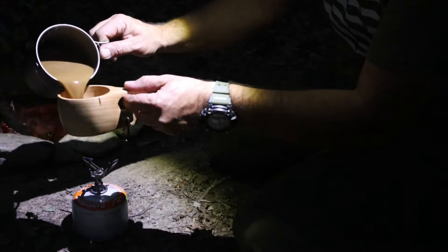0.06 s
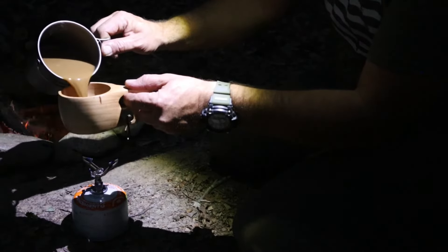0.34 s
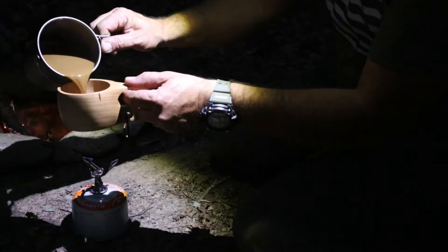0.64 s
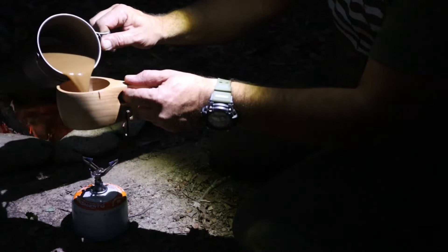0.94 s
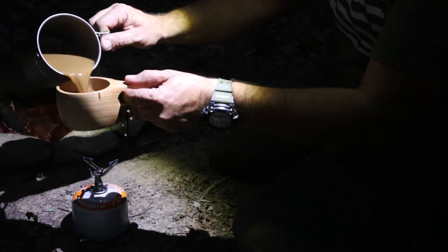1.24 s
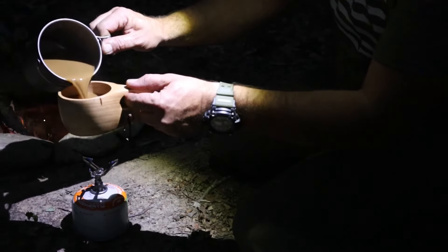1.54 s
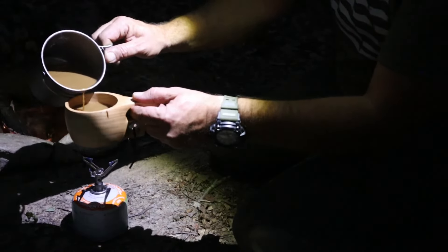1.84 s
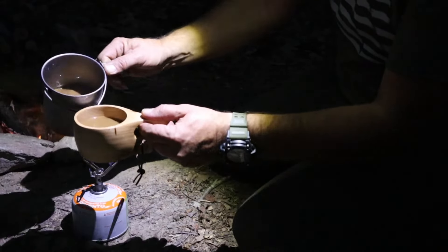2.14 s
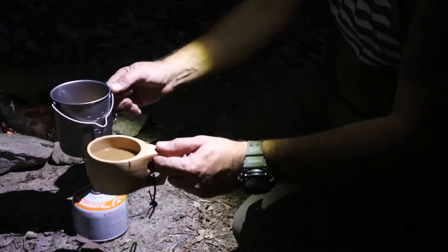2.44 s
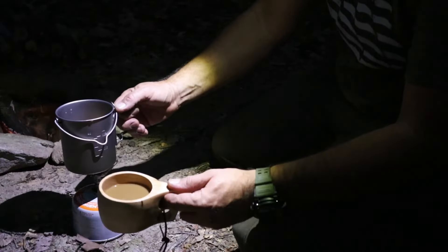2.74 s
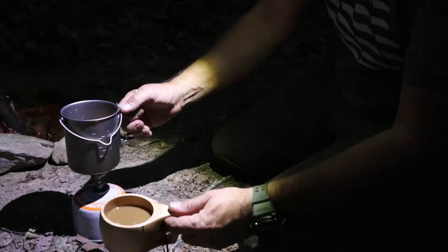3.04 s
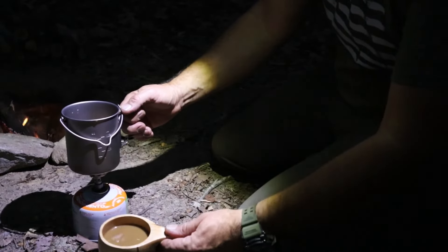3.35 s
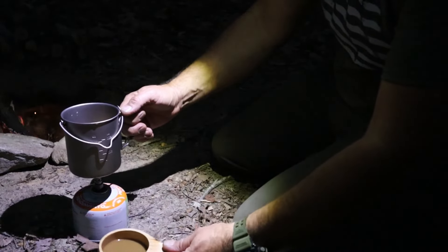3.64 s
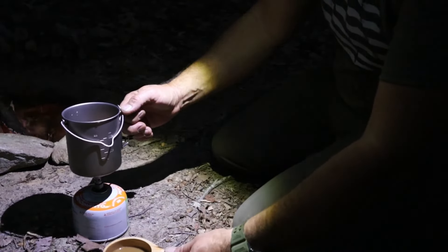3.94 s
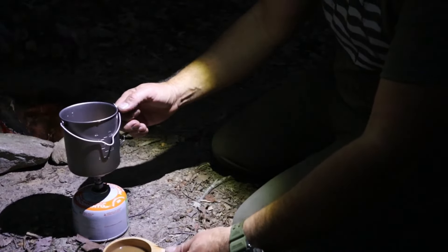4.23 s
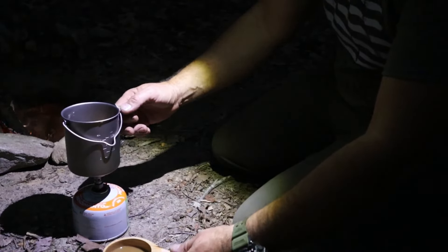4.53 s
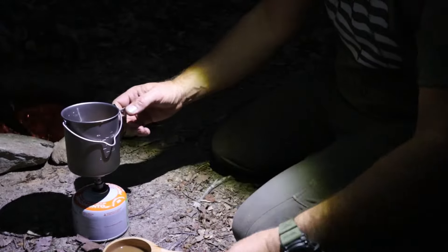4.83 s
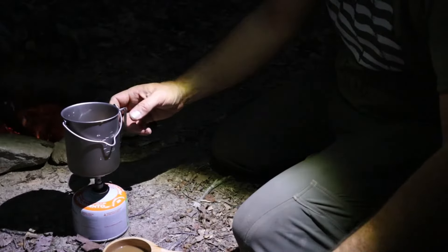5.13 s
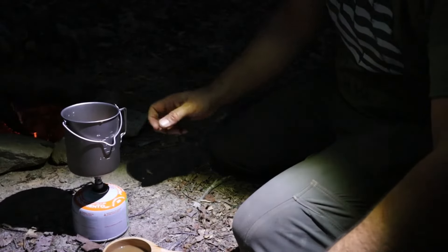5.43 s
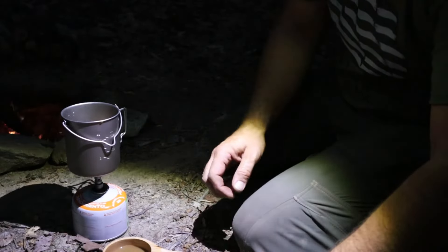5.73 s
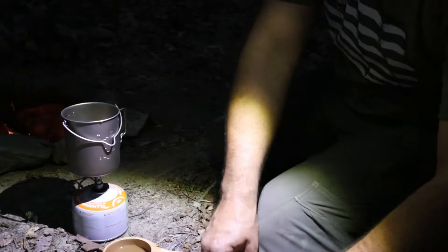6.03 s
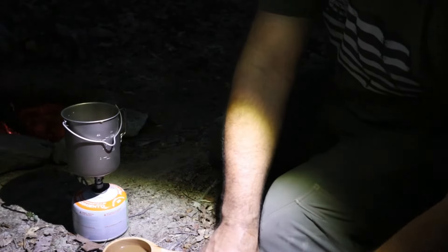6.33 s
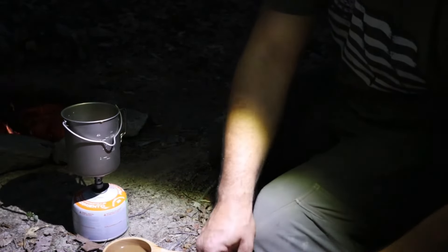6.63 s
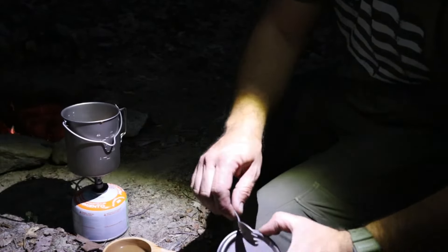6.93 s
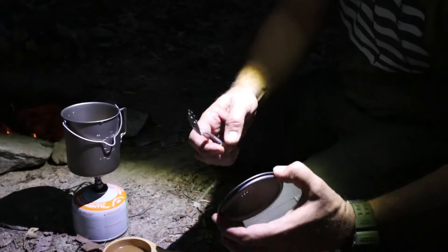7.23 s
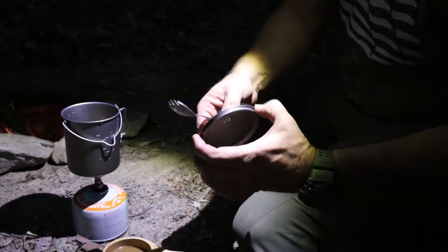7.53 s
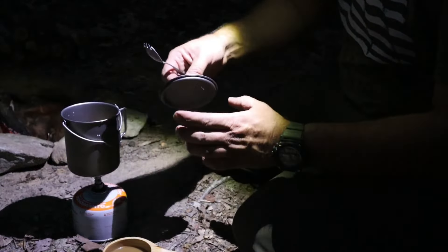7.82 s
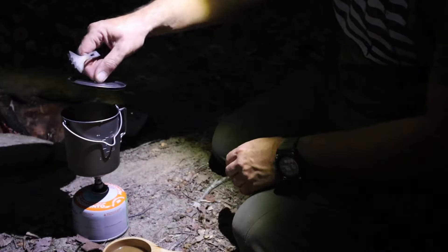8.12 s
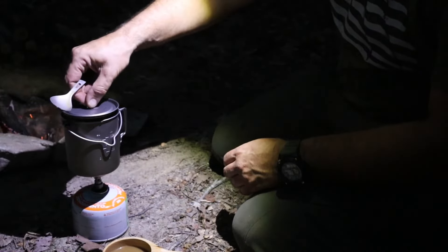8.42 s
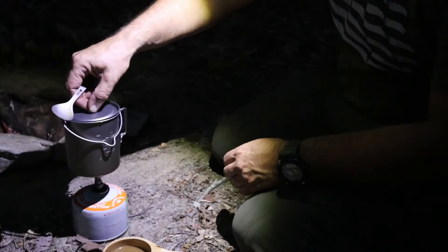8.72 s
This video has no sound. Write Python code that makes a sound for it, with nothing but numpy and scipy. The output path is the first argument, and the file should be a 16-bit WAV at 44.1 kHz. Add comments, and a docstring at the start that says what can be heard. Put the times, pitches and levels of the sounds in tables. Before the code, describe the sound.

Close up at an outdoor camp at night, coffee trickles softly into a wooden cup from about 0.4 seconds, with small bubbling plips and a brief hollow note as the stream ends near 2.2 seconds. From 2.8 to 4.4 seconds a thin metal pot scrapes, catches and faintly hums as it slides on a stove, followed by tiny rubs of its wire handle. Around 5.8 seconds dry leaves rustle softly, and a lid grates over stony ground until 6.7. At 7 seconds a spork strikes the lid with one sharp, ringing clink, the loudest sound. A short scrape and tap follow at 7.6 and 7.8, then a dull knock at 8. From 8.6 to 8.9 the lid rattles into the pot's rim and settles with a soft bump. Throughout there is a faint, high insect drone, a low hush of air and sparse ember ticks, with very little echo.

```python
"""A camp at night. Coffee trickles from a thin metal pot into a wooden cup, where bubbles ring.
The pot is slid onto a stove's arms, catching and slipping so that its wall hums. Its lid is dragged
off the ground, clinks against a spork and is seated on the pot. Each touch of metal is a burst of
tiny blows that sets the object's own tones ringing. Insects drone in the trees, a low fire ticks,
and rocks and trees send back a faint echo."""
import sys
import numpy as np
from scipy import signal
from scipy.fft import rfft, irfft, next_fast_len
from scipy.io import wavfile
from scipy.ndimage import map_coordinates

SR = 44100
rng = np.random.default_rng(int(sys.argv[2]) if len(sys.argv) > 2 else 0)


def generate_wav(sig):
    """Save sig (samples, or channels by samples) to the path in sys.argv[1] as 16-bit PCM at SR."""
    pcm = np.round(np.clip(np.atleast_2d(sig).T, -1, 1) * 32767).astype(np.int16)
    wavfile.write(sys.argv[1], SR, pcm)


N = 395577
TIME = np.arange(N) / SR  # seconds through the scene
T = np.arange(SR // 5) / SR  # seconds through one short sound

# Levels are relative: the functions add their own gains. t60 is the time to fade by 60 dB.
# The stream splashing in the cup: t/s, level/dB
STREAM_LEVEL = [(0, -86), (.33, -83.5), (.42, -63.5), (.6, -71), (.95, -70), (1.2, -92), (1.8, -77),
                (2.1, -57), (2.16, -84), (2.5, -110)]
# The hollow note of the thinning stream: t/s, f/Hz, level/dB
STREAM_NOTE = [(1.85, 680, -95), (1.87, 680, -65), (1.94, 665, -69.5), (2.01, 650, -60), (2.1, 615, -66.5),
               (2.17, 600, -83)]
# The larger bubbles: t/s, level/dB, f/Hz
BIG_BUBBLES = [(0.47, -37, 5200), (.489, -40, 5550), (.505, -35.5, 5480), (.506, -42.5, 1550),
               (.542, -47.5, 2780), (.566, -46, 5500), (.585, -51, 5140), (0.831, -47, 2970),
               (.849, -51, 1620), (.91, -51, 1840), (.935, -49, 1870), (1.752, -42, 4720),
               (1.768, -44, 2840), (1.862, -39.5, 2210), (1.863, -45, 830), (1.967, -47.5, 1900),
               (2.302, -47, 2650), (2.303, -44, 875)]
# The hand nudges the pot along: start/s, end/s, low hum/dB, high hum/dB, rasp/dB
POT_PUSHES = [(2.881, 3.342, -60, -69, -71), (3.531, 3.702, -60, -56, -71), (3.9, 4.38, -59.5, -53.5, -65)]
# Soft bumps of hand, cup, lid and knee: t/s, level/dB, f/Hz
SOFT_BUMPS = [(2.286, -56, 161), (3.38, -48, 192), (3.911, -46.5, 204), (5.774, -57, 170),
              (6.189, -45.5, 277), (6.992, -45, 200), (8.03, -26.5, 930), (8.03, -45, 270),
              (8.873, -29, 330), (8.89, -36, 205)]

# Simple touches: t/s, level/dB, length/s
STOVE_SLIPS = [(2.815, -42, 0.0093), (2.87, -47.5, .05), (2.934, -44.5, 0.032), (2.979, -46.5, 0.065),
               (3.004, -41, 0.018), (3.031, -40.5, 0.096), (3.096, -44, 0.097), (3.196, -40.5, .02),
               (3.294, -53, .025), (3.328, -48.5, .036), (3.533, -58, .07), (3.609, -41.5, 0.066),
               (3.623, -31, .028), (3.641, -36.5, 0.042), (3.67, -38.5, 0.054), (3.696, -38, 0.041),
               (3.718, -45, .018), (3.868, -43, .022), (3.876, -39, 0.058), (3.926, -48, .028),
               (4.053, -46, .018), (4.13, -48.5, 0.073), (4.305, -53.5, 0.064)]  # the pot catches and slips
GROUND_DRAGS = [(5.765, -55, 0.043), (5.871, -42.5, .016), (5.915, -53, 0.099), (6.1, -59, 0.066),
                (6.299, -39.5, 0.043), (6.386, -41, 0.025), (6.404, -34, .02), (6.421, -42, 0.043),
                (6.521, -48.5, .028), (6.541, -48, 0.0078), (6.573, -31.5, 0.035), (6.72, -57, 0.075)]  # lid and spork rub over stony ground
RIM_KNOCKS = [(8.6, -39.5, 0.0046), (8.606, -39, 0.0066), (8.63, -38.5, 0.073), (8.688, -42, 0.035),
              (8.729, -30, 0.013), (8.7325, -27, .014), (8.83, -36.5, .036), (8.837, -29.5, 0.013),
              (8.847, -41, .024), (8.872, -32, .032), (8.889, -38, .02)]  # the lid lands and settles
EMBER_CRACKS = [(.2195, -63.5, 0.014), (.383, -48.5, .007), (.409, -53, 0.015), (1.351, -61, 0.0079),
                (1.637, -55, 0.015), (1.655, -55.5, 0.0042), (4.517, -60, 0.0046), (5.612, -62, 0.0021),
                (6.068, -64, 0.0079), (6.123, -64, .004), (6.652, -68, 0.013), (8.274, -57, 0.0053),
                (8.96, -62, 0.0072)]  # the louder embers

# Detailed touches: t/s, mid level/dB, bass over mid/dB, treble over mid/dB, rise/s, fall/s
HINGE_RUBS = [(4.438, -48.5, -11, -7, 0.0086, 0.021), (4.451, -50.5, -8, 0.5, 0.005, 0.014),
              (4.747, -61.5, -4, -0.5, 0.02, 0.026), (4.845, -51, -7.5, -1.5, 0.02, 0.055)]  # the pot's handle turns as the fingers let go
LID_STRIKES = [(6.995, -11.5, -16, -6.5, 0, 0.0036), (7.128, -59, -23, -20, 0.023, 0.016),
               (7.184, -67, -5, 4, 0, 0.005), (7.215, -65.5, -14, 5, 0.02, 0.05)]  # the spork strikes and brushes the lid
LID_SCRAPES = [(7.612, -47.5, -9, -2, 0.0046, 0.017), (7.629, -24, -23, -10, 0.013, 0.017),
               (7.6445, -31, -26, -0.5, 0.00032, 0.0053), (7.683, -48, -15, -5.5, 0.023, 0.084)]  # it slides across the lid
LID_TAPS = [(7.776, -53.5, -0.5, -3, 0.013, 0.074), (7.8005, -24.5, -31, -18, 0, 0.0065),
            (7.8505, -42, -20, -1, 0, .003), (7.922, -56, -9, -3.5, 0.0069, 0.019)]  # it taps the lid

# The tones an object rings with: f/Hz, level/dB, t60/s
POT_TONES = [(797, -4.5, 0.18), (893, -14.5, 0.16), (1201, -8, 0.12), (1350, -16.5, 0.16),
             (1690, -20.5, 0.15), (1953, -5.5, 0.051), (2050, -10, 0.098), (2570, 0.5, 0.02),
             (2940, -5, 0.075), (3113, 7.5, 0.033), (3260, -3, 0.029), (3330, -26, 0.059), (3930, -15, 0.1),
             (4960, 1, 0.063), (5270, -10, 0.02), (5280, 7, 0.017), (5566, 1.5, 0.052), (6480, -14.5, 0.16)]
GROUNDED_LID_TONES = [(1216, -15, 0.12), (2000, 4, 0.03), (2280, 3.5, 0.0098), (2945, 3, 0.047),
                      (3150, 3, 0.02), (3510, -6, 0.072), (6110, -22, .04), (7040, -17, 0.035),
                      (8460, -19, .05), (10000, -16, 0.043), (11300, -24, 0.044)]
FREE_LID_TONES = [(657, 1, .095), (1297, -12, .13), (2160, -4, .09), (2195, -5, .11), (2349, -1, .06),
                  (2434, -1, .06), (2556, -5, .09), (2603, -4, .11), (2685, -2, .06), (3035, -5, .09),
                  (3169, 2, .08), (3293, 0, .06), (3348, -3, .1), (3505, -1, .06), (3583, -3, .1),
                  (4640, -5, .11), (5330, -7, .09), (5523, -8, .09), (6191, -12, .13), (6557, -10, .15),
                  (6620, 0, .06), (8091, -10, .16), (9302, -9, .12), (11610, -15, .11), (12490, -14, .08),
                  (13600, -18, .09)]
SPORK_TONES = [(1287, -24, .15), (2180, -20, .05), (2650, -18, .025), (3042, -23, .17), (3564, 3, .036),
               (3612, -23, .25), (5324, -10, .05), (6202, -15, .09), (7100, -13, .05), (8350, -19, .08),
               (9600, -14, .04), (10100, -26, .1)]
SPORK_ON_LID_TONES = [(757, -15, 0.039), (1500, -26, 0.033), (2223, -4, 0.025), (2680, -2, 0.023),
                      (3090, 0, 0.012), (3306, -0.5, 0.013), (5250, 2.5, 0.015), (6630, -11, .03),
                      (8400, -20, 0.069), (10200, -19, 0.046), (12000, -15, 0.057)]
CLOSED_POT_TONES = [(341, -16, 0.0082), (650, 1.5, 0.042), (868, 11.5, 0.033), (1060, 8, 0.032),
                    (1670, 15.5, 0.015), (2070, -2, 0.062), (2400, 14, 0.024), (2576, 13.5, 0.044),
                    (3070, 1, 0.065), (3860, 0, 0.081), (4730, 9, 0.013), (6240, -17, .06),
                    (6550, -12, 0.095), (7250, -19, 0.05), (8370, -12, .07), (10000, -14.5, 0.077),
                    (10800, -16, 0.072)]
# Tones that sing on after a touch: t/s, f/Hz, level/dB, t60/s
LASTING_TONES = [(3.623, 1948, -34.5, .11), (6.996, 2602, -50, .75), (6.996, 2635, -53, .7),
                 (6.996, 2558, -52, .5), (7.8, 1287, -39, .19), (8.601, 6020, -44, .16),
                 (8.731, 5205, -36, .25), (8.872, 3040, -43, .16)]

# How strong each noise is from low pitch to high: f/Hz, level/dB
POT_SPECTRUM = [(200, -18), (340, 3), (550, -21), (1100, -1), (1600, -30), (1950, -33), (3100, 2.5),
                (4100, -6.5), (5500, -2.5), (7500, -19.5), (11000, -19), (15500, -30)]
HANDLE_SPECTRUM = [(180, -51), (300, -42), (922, 5), (1840, -29), (2520, 9), (2930, -24), (5300, -4.5),
                   (7620, -18), (11000, -13.5), (15500, -26)]
DRAG_SPECTRUM = [(200, -37), (600, -26), (1250, -11), (1650, -16), (2200, -3), (3000, -2.5), (4000, -8),
                 (5600, -24), (10000, -30), (15500, -36)]
LID_SPECTRUM = [(40, -19), (200, -13), (450, -15), (900, -19), (1500, -15), (2150, 1), (3400, -1),
                (4100, -14), (5400, -8), (7300, -8), (10500, -21), (13000, -17), (15800, -23)]
SPORK_SPECTRUM = [(120, -66), (200, -38), (408, -65.5), (706, -15), (1120, -37), (1520, -7), (1830, -29),
                  (2590, -5.5), (3160, -25), (3940, -24), (5470, -8), (15800, -34)]
CLOSED_POT_SPECTRUM = [(41, -65), (70, -35), (181, -29), (350, -1), (551, -28), (646, -5), (1870, 2.5),
                       (2580, 9), (3540, -1.5), (4640, -5), (9380, -29), (13500, -25), (15800, -32)]
LEAF_SPECTRUM = [(300, -12), (900, 4), (2000, 5), (4000, 4), (7000, -5), (11000, -5), (15500, -13)]
EMBER_SPECTRUM = [(200, -20), (1200, -20), (3000, 12), (7000, 4.5), (15000, -1)]
INSECT_SPECTRUM = [(3000, -50), (3300, -19), (3500, -8), (3700, -2), (4050, 0), (4300, -1), (4450, -9),
                   (4600, -12), (4900, -50.5)]
AIR_SPECTRUM = [(20, 0.5), (50, 5.5), (100, 3.5), (180, 3.5), (300, -0.5), (500, -5), (800, -3.5),
                (1300, -8.5), (2500, -10.5), (5000, -11), (9000, -16), (15500, -17)]


def coffee_stream():
    """Coffee splashes softly in the cup, with a hollow note as the stream thins."""
    spectrum = [(400, -23.5), (900, 4.5), (2000, -6), (3200, 7), (5500, -4), (8000, -19.5), (15000, -14)]
    splashing = coloured(grit(N, 10) * amp(4 * wobble(45)), spectrum)
    note_hz, note_db = curves(STREAM_NOTE)
    wavering_hz = note_hz * (1 + 0.0095 * wobble(48))
    note = np.sqrt(2) * np.sin(2 * np.pi * np.cumsum(wavering_hz) / SR)
    return amp(curves(STREAM_LEVEL)[0]) * splashing + amp(note_db + 0.67 * wobble(40)) * note


def big_bubbles():
    """Each bubble rings briefly, rising in pitch, with a little splash around its note."""
    sound = np.zeros(N)
    for s, db, hz in BIG_BUBBLES:
        bubble = np.sin(2 * np.pi * hz * (T + 2 * T ** 2))
        spectrum = [(hz / 3, -22), (hz * 0.8, -10), (hz, 0), (hz * 1.27, -10), (hz * 3, -26)]
        splash = noise(len(T), spectrum)
        envelope = fade_in(0.00053) * fade(0.024)
        add(sound, s - .001, amp(db) * envelope * (0.76 * bubble + 0.35 * splash))
    return sound


def tiny_bubbles(count=130, centre_hz=3200, spread_octaves=1.26):
    """Tiny bubbles burst at random, most often while the stream splashes most."""
    pour_samples = round(STREAM_LEVEL[-1][0] * SR)
    poured = np.cumsum(amp(0.21 * curves(STREAM_LEVEL)[0][:pour_samples]))
    sound = np.zeros(N)
    for when, size, pitch in rng.uniform(size=(count, 3)):
        hz = centre_hz * 2 ** (spread_octaves * (2 * pitch - 1))
        pop = np.sin(2 * np.pi * hz * (T + 4 * T ** 2)) * fade(0.0061)
        s = np.searchsorted(poured, when * poured[-1]) / SR
        add(sound, s, amp(-62 + 9 * size ** 2) * pop)
    return sound


def pot_on_stove(wall_hz=(829, 877), growth_db_per_s=24, catches_per_push=5):
    """With each push the pot rasps and catches on the stove arms, and its wall's hum builds in fits."""
    body = lambda: ring(POT_TONES) + amp(-4.5) * noisy_ring(POT_SPECTRUM, 0.027)
    low, high = (unit(hum(hz, width_hz=31) * amp(5.3 * wobble(18))) for hz in wall_hz)
    friction = grit(N, 4.7) * amp(3.2 * wobble(65))
    rasp = unit(signal.fftconvolve(friction, body())[:N])
    sound, catches = np.zeros(N), []
    for start, end, low_db, high_db, rasp_db in POT_PUSHES:
        growth = amp(growth_db_per_s * np.minimum(TIME - end, 0))
        wall = growth * (amp(low_db) * low + amp(high_db) * high)
        sound += held(start, end, rise_s=0.12, fall_s=0.092) * (wall + amp(rasp_db) * rasp)
        for when, size in rng.uniform(size=(catches_per_push, 2)):
            catches.append((start + when * (end - start), -57 + 7 * size, 0.01117))
    slips = detailed(STOVE_SLIPS + catches, bass=(-11, -0.87), treble=(-4.5, 0.32),
                     rise_s=.0068, rise_power=1.9)
    return sound + amp(-1) * contacts(slips, body, chatter_db=-31, spread_db=9.5, low_cut_hz=350)


def lid_dragged():
    """Lid and spork grate over stony ground, which muffles their ring."""
    body = lambda: ring(GROUNDED_LID_TONES) + amp(-1) * noisy_ring(DRAG_SPECTRUM, 0.013)
    drags = detailed(GROUND_DRAGS, bass=(-11.5, -0.57), treble=(-12, -0.37),
                     rise_s=0.024, rise_power=1.7)
    return amp(0.5) * contacts(drags, body, chatter_db=-21, spread_db=11.5, low_cut_hz=302)


def lid_clink():
    """One sharp blow from the spork rings the lid until the hand closes on it; light brushes follow."""
    grip = amp(np.interp(T, [.044, .056], [0, -9]))
    body = lambda: grip * (ring(FREE_LID_TONES) + amp(3.5) * noisy_ring(LID_SPECTRUM, .017)
                           + amp(-4.5) * noisy_ring(LID_SPECTRUM, .115))
    return amp(2) * contacts(LID_STRIKES, body, chatter_db=-40, spread_db=4, low_cut_hz=75)


def spork():
    """The spork's handle scrapes and taps on the held lid; fingers quickly stop the ringing."""
    pressed = lambda: ring(SPORK_ON_LID_TONES) + amp(-4.5) * noisy_ring(SPORK_SPECTRUM, 0.015)
    tapped = lambda: ring(SPORK_TONES) + amp(-11) * noisy_ring(SPORK_SPECTRUM, .012)
    scrapes = contacts(LID_SCRAPES, pressed, chatter_db=-13.5, spread_db=5, low_cut_hz=505)
    return scrapes + contacts(LID_TAPS, tapped, chatter_db=-29, spread_db=26, low_cut_hz=503)


def lid_seated(rub_span_s=(8.662, 8.699), start_hz=910, end_hz=694):
    """The lid rattles into the rim, brighter on hard knocks; as it rubs, its hollow note sinks."""
    body = lambda: (ring(CLOSED_POT_TONES) + amp(-0.5) * noisy_ring(CLOSED_POT_SPECTRUM, 0.02)
                    + amp(-4) * noisy_ring(CLOSED_POT_SPECTRUM, 0.1))
    knocks = detailed(RIM_KNOCKS, bass=(6.5, -0.56), treble=(-17, 0.99), rise_s=.0095, rise_power=1.6)
    sunk = np.interp(TIME, rub_span_s, [0, 1])
    note = np.sqrt(1 - sunk) * hum(start_hz, width_hz=130) + np.sqrt(sunk) * hum(end_hz, width_hz=98)
    rub = amp(-38) * held(*rub_span_s, rise_s=0.0068, fall_s=0.005) * note
    return rub + amp(-1.3) * contacts(knocks, body, chatter_db=-27, spread_db=5.5, low_cut_hz=202)


def after_ring():
    """Tones that do not move the metal under the fingers outlast the rest."""
    sound, t = np.zeros(N), TIME[:SR]
    for s, hz, db, t60 in LASTING_TONES:
        add(sound, s, amp(db - 60 * t / t60) * np.sin(2 * np.pi * hz * t))
    return sound


def wire_handle():
    """Thin wire rubs brightly in its hinge and only faintly stirs the pot."""
    body = lambda: noisy_ring(HANDLE_SPECTRUM, 0.014) + amp(-5) * ring(POT_TONES)
    return amp(0.9) * contacts(HINGE_RUBS, body, chatter_db=-25, spread_db=16, low_cut_hz=400)


def bumps(cycles=8):
    """Dull knocks: a tone and a puff of noise that die away within a few vibrations."""
    sound = np.zeros(N)
    for s, db, hz in SOFT_BUMPS:
        puff = noise(len(T), [(hz / 3, -25), (hz, 0), (hz * 2, -6), (hz * 10, -35)])
        envelope = fade_in(0.0032) * fade(cycles / hz)
        add(sound, s, amp(db + 5) * envelope * (np.sin(2 * np.pi * hz * T) + .5 * puff))
    return sound


def leaves():
    """Dry leaves rustle softly as the fingers search for the lid."""
    rustle = coloured(grit(N, 16) * amp(2.2 * wobble(30)), LEAF_SPECTRUM)
    return amp(-60.5) * held(5.76, 6.13, rise_s=0.034, fall_s=0.062) * rustle


def fire(faint_count=4):
    """Embers tick dryly with no ring: a few cracks, and tiny thin ones at random."""
    margin_s = T[-1]
    faint = [(margin_s + when * (N / SR - 2 * margin_s), -76 + 8 * size, 0.0046)
             for when, size in rng.uniform(size=(faint_count, 2))]
    ticks = detailed(EMBER_CRACKS + faint, bass=(-22.5, -0.83), treble=(-7, -0.51),
                     rise_s=.016, rise_power=1)
    body = lambda: noisy_ring(EMBER_SPECTRUM, 0.0068)
    return amp(-.2) * contacts(ticks, body, chatter_db=-27, spread_db=14, low_cut_hz=400)


def insects():
    """Countless far insects merge into one drone whose low and high voices swell separately."""
    voices = lambda: noise(N, INSECT_SPECTRUM) * amp(1.2 * wobble(7.2) + .7 * wobble(40))
    low_share = lambda hz: np.clip((4200 - hz) / 400, 0, 1)
    low = filtered(voices(), lambda hz: np.sqrt(low_share(hz)))
    high = filtered(voices(), lambda hz: np.sqrt(1 - low_share(hz)))
    return amp(-59 + 0.32 * wobble(1.7)) * unit(low + high)


def night_air():
    """Still air: a faint, low hush whose level drifts a little."""
    return amp(-63.5) * noise(N, AIR_SPECTRUM) * amp(0.77 * wobble(2.6))


def echo(sound):
    """Rocks and trees scatter a little of the sound back."""
    spectrum = [(100, -12), (1000, -0.5), (3000, -1), (8000, -4), (15000, -7)]
    scatter = noisy_ring(spectrum, t60=0.38) * fade_in(0.018)
    return amp(-29) * signal.fftconvolve(sound, scatter)[:N]


def contacts(rows, body, chatter_db, spread_db, low_cut_hz):
    """Play detailed touches: a blow and a swell of tiny slips shake the ring made by body()."""
    track, lead = np.zeros(N), 128  # samples of silence before each touch
    below = lambda hz, edge: 1 / (1 + (hz / edge) ** 12)
    bass = lambda hz: below(hz, 1500)
    mid = lambda hz: below(hz, 4700) - bass(hz)
    treble = lambda hz: 1 - below(hz, 4700)
    low_cut = signal.butter(2, low_cut_hz, "high", fs=SR)  # small things give off little bass
    for s, db, bass_db, treble_db, rise, fall in rows:
        swell = amp(-20 * np.maximum((rise - T) / (rise + 1 / SR), (T - rise) / fall))
        force = amp(chatter_db) * swell * grit(len(T), spread_db)
        force[round(rise * SR)] += np.exp(-rise / 0.0094)  # a slow approach has almost no blow
        ringing = signal.fftconvolve(force, body())[:len(T)]
        ringing = np.pad(signal.lfilter(*low_cut, ringing), (lead, 0))
        bands = [(bass_db, bass), (0, mid), (treble_db, treble)]
        sound = sum(amp(level) * norm(filtered(ringing, band)) for level, band in bands)
        gain = amp(db) * np.sqrt(SR / 100)  # db is the mid level if packed into 10 ms
        add(track, s - rise - lead / SR, gain * sound)
    return track


def detailed(rows, bass, treble, rise_s, rise_power):
    """Turn simple touches into detailed ones: strength sets the colour, and long slips start slowly."""
    s, db, length = np.transpose(rows)
    harder_db, times_longer = db + 45, length / .04  # against a touch of -45 dB and 0.04 s
    # bass and treble are each (dB for that touch, dB gained per dB harder)
    bass_db, treble_db = (level + slope * harder_db for level, slope in (bass, treble))
    rise = np.minimum(rise_s * times_longer ** rise_power, np.minimum(.8 * length, T[-1] / 2))
    return np.transpose([s, db, bass_db, treble_db, rise, length - rise])


def ring(tones):
    """An object's fading tones, at new strengths for every touch."""
    sound = np.zeros(len(T))
    for hz, db, t60 in tones:
        strength = amp(db + 2 * rng.normal()) * rng.choice([-1, 1])
        sound += strength * fade(t60) * np.sin(2 * np.pi * hz * T)
    return norm(sound)


def noisy_ring(spectrum, t60):
    """Tones so crowded that they blur into one fading noise."""
    return norm(noise(len(T), spectrum) * fade(t60))


def hum(hz, width_hz):
    """One rough tone kept going by rubbing."""
    return unit(filtered(rng.standard_normal(N), lambda f: 1 / (1 + ((f - hz) / width_hz) ** 2)))


def grit(size, spread_db):
    """A run of tiny blows of very uneven strength."""
    blows, strength = rng.standard_normal((2, size))
    return unit(blows * amp(spread_db * np.minimum(strength, 2)))


def noise(size, spectrum):
    """Smooth noise with the given spectrum."""
    return coloured(rng.standard_normal(size), spectrum)


def coloured(x, spectrum):
    """Shape x by (f/Hz, level/dB) points, then scale it to an average (rms) level of 1."""
    f, db = np.transpose(spectrum)
    return unit(filtered(x, lambda hz: amp(np.interp(np.log(hz + 1), np.log(f), db))))


def filtered(x, response):
    """Scale each frequency in x by response(hz)."""
    size = next_fast_len(len(x) + 4096)
    return irfft(rfft(x, size) * response(np.fft.rfftfreq(size, 1 / SR)), size)[:len(x)]


def wobble(rate):
    """A smooth random curve through rate new values a second."""
    return map_coordinates(rng.standard_normal(int(N * rate / SR) + 4), [TIME * rate])


def curves(rows):
    """Join a table's rows with straight lines: one curve for each column after the time."""
    s, *columns = np.transpose(rows)
    return [np.interp(TIME, s, column) for column in columns]


def held(start, end, rise_s, fall_s):
    """Full strength from start to end; 20 dB down rise_s before and fall_s after."""
    outside = np.maximum((start - TIME) / rise_s, (TIME - end) / fall_s)
    return amp(-20 * np.maximum(outside, 0))


def fade_in(seconds):
    """A soft start, about two thirds of the way up after this time."""
    return 1 - np.exp(-T / seconds)


def fade(t60):
    """Die away by 60 dB every t60 seconds."""
    return amp(-60 * T / t60)


def amp(db):
    """Decibels to gain."""
    return 10 ** (np.asarray(db) / 20)


def unit(x):
    """Scale to an average (rms) level of 1."""
    return x / np.sqrt(np.mean(x ** 2) + 1e-30)


def norm(x):
    """Scale to a total energy of 1."""
    return x / np.sqrt(np.sum(x ** 2) + 1e-30)


def add(track, s, sound):
    """Mix a sound into the track at s seconds."""
    i = round(s * SR)
    track[i:i + len(sound)] += sound[:max(N - i, 0)]


def scene():
    """The close sounds and their echo, over insects and air, in one channel."""
    coffee = coffee_stream() + big_bubbles() + tiny_bubbles()
    pot = pot_on_stove() + wire_handle()
    lid = leaves() + lid_dragged() + lid_clink() + spork() + lid_seated()
    near = coffee + pot + lid + after_ring() + bumps() + fire()
    return (near + echo(near) + insects() + night_air())[None]


def record(dry):
    """Clip at full scale, thin out the deepest bass and cut off the highest treble."""
    low_cut_hz, top_hz = 70, 15900
    sound = signal.lfilter(*signal.butter(1, low_cut_hz, "high", fs=SR), np.clip(dry[0], -1, 1))
    return filtered(sound, lambda hz: 1 / (1 + (hz / top_hz) ** 200))[None]


dry = scene()
out = record(dry)
generate_wav(out)
```